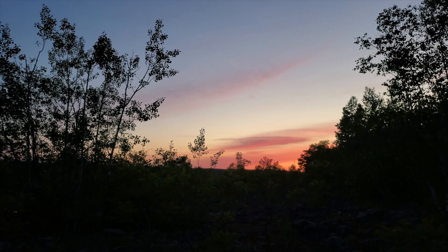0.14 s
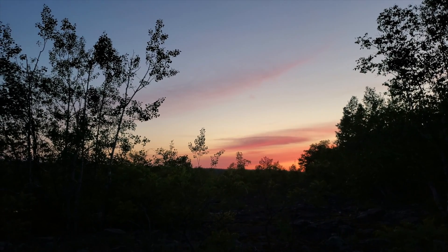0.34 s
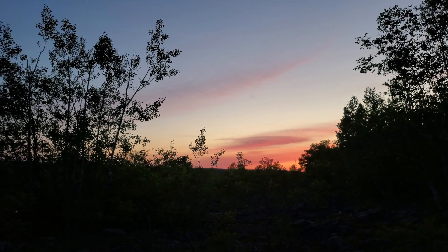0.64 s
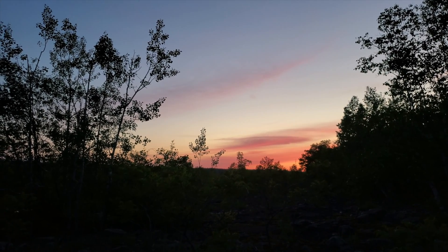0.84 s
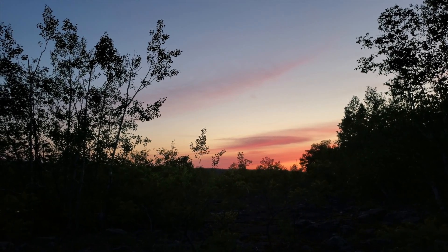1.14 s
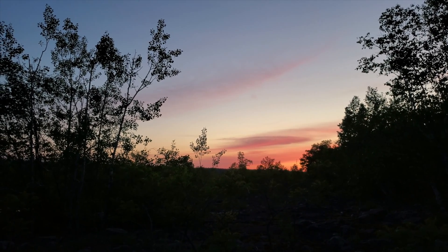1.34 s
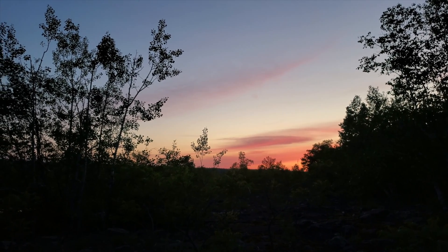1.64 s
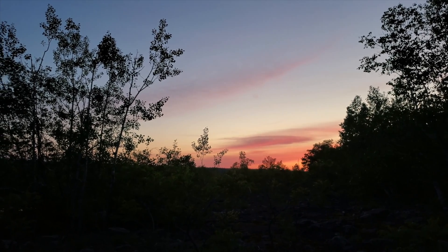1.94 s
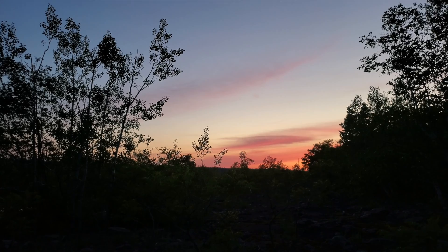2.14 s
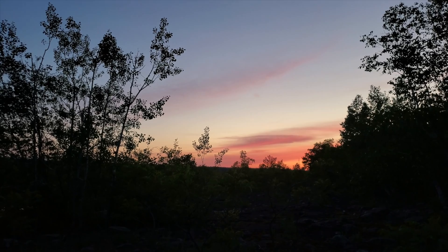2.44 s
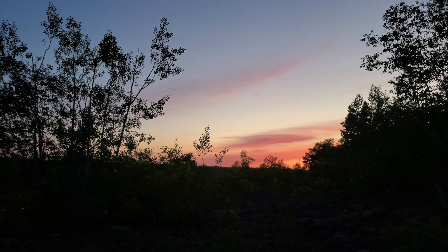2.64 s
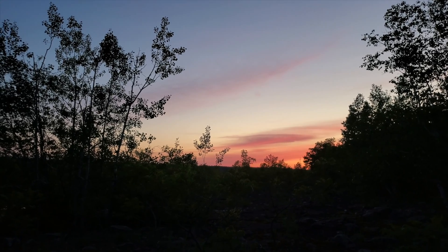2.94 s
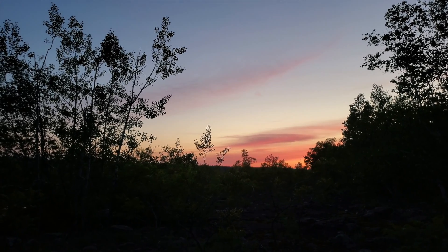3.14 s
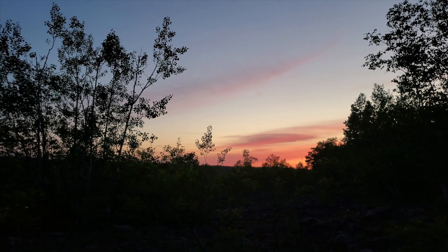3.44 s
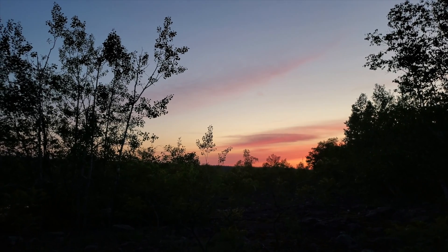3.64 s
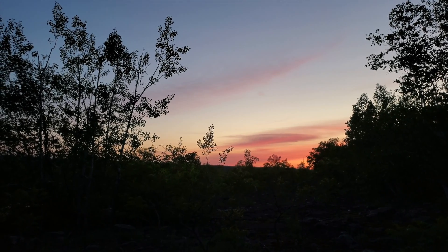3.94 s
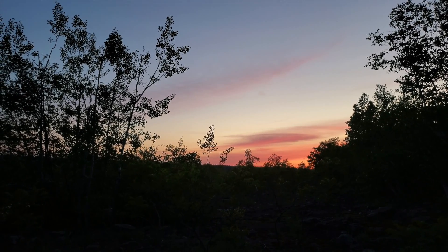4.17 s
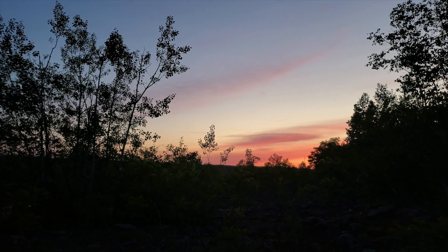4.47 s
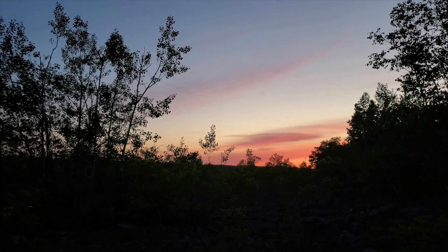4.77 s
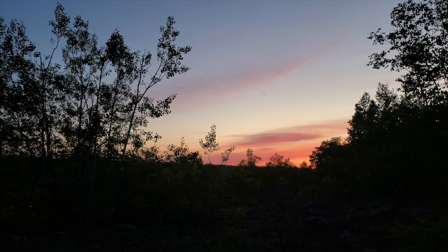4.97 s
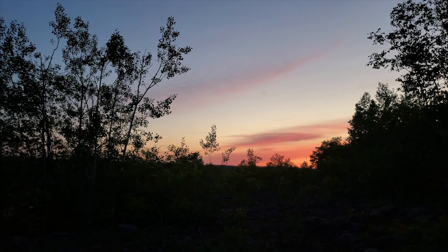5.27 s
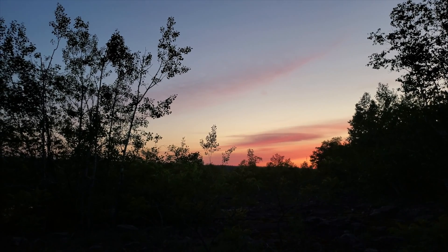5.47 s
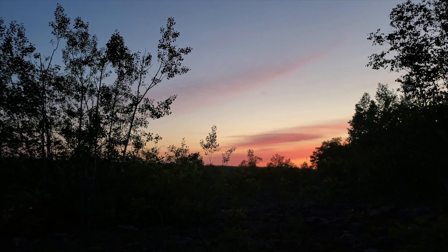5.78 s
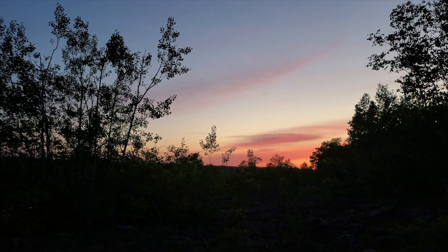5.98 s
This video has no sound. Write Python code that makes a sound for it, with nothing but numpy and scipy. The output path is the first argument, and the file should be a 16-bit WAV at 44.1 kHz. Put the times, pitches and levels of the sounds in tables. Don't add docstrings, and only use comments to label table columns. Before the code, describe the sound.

Dusk in a forest clearing, picked up in stereo. A nightjar dominates with pure whistled three-note songs, peaking near 1.0, 1.9, 2.9, 3.8, 4.8 and 5.7 s; another song begins as the stretch ends. Each has a brisk first note around 1.6 kHz, a lower stepped second, then a leap to 2.7 kHz falling back; from the second song a soft low cluck leads it. Trees return a diffuse echo lasting under a second. Nighthawks rasp for a quarter second on the left: near at 1.9, 3.3 and 5.1 s, fainter at 0.4, 0.9, 2.7, 3.9, 4.5 and 5.7. Thin bird whistles appear at the start, 1.8, around 4.1-4.5 and 5.8 s. Faint frogs trill in bouts over a distant blurred chorus. Underneath: low rumble, wavering 95 Hz hum, weak leaf rustle, hiss swelling with calls, and soft bumps near 0.6, 1.6, 1.9, 3.9 (very faint), 5.6 and 5.8 s.

```python
import sys
import numpy as np
from scipy import signal
from scipy.fft import rfft, irfft, next_fast_len
from scipy.io import wavfile
from scipy.ndimage import uniform_filter1d

SR = 44100
rng = np.random.default_rng(int(sys.argv[2]) if len(sys.argv) > 2 else 0)


def generate_wav(signal):
    frames = np.transpose(np.atleast_2d(signal))
    scaled = np.clip(frames, -1, 1) * 32767
    pcm = np.round(scaled).astype(np.int16)
    wavfile.write(sys.argv[1], SR, pcm)


def boost(x):
    u = np.asarray(x, float) / 20
    return 10 ** u


N = 269451

# frequency in Hz, density in dB per Hz.
RUMBLE_SPECTRUM = [(20, -29), (39, -9), (59, 3), (113, -3), (136, -10.5), (151, -20.5), (200, -33),
                   (440, -120)]
# centre in seconds, level in dB.
GUSTS = [(0.02, -75), (1.99, -58), (3.899, -65), (4.47, -74), (4.78, -55.5), (5.23, -60.5), (5.62, -64.5),
         (5.82, -53.5)]
# frequency in Hz, density in dB per Hz.
RUSTLE_SPECTRUM = [(120, 3.5), (200, 1.5), (400, -0.5), (700, -6), (1100, -44.5)]
# start in seconds, length in seconds, level in dB.
BREEZES = [
    (.3, 0.89, -79.5),
    (1.55, 0.71, -76.5),
    (2.55, 0.69, -72.5),
    (3.6, 0.59, -69.5),
    (4.65, .85, -74.5),
    (5.8, .6, -74.5),
]
# time in seconds, peak in dB, left minus right in dB.
BUMPS = [
    (0.579, -55, 7),
    (1.562, -41, -17.5),
    (1.946, -38.5, -15),
    (3.857, -64, 55),
    (5.636, -40.5, -22),
    (5.82, -39.5, -11),
]
# frequency in Hz, density in dB.
HISS_SPECTRUM = [(1500, -29), (2800, -12), (3400, -6.5), (4200, -18), (5500, -18), (8000, -23.5),
                 (13000, -14.5), (16000, -17)]
# chirps per second, first chirp in seconds, lowest pitch in Hz, highest pitch in Hz,
# half-pitch level in dB, left minus right in dB.
FROGS = [
    (16.93, 0.041, 1720, 2200, -11, 11.5),
    (25.42, 0.019, 1900, 2400, -6, 3.5),
    (37.35, 0.015, 1100, 2250, -20, -1),
]
# start in seconds, length in seconds, level in dB.
FROG_BOUTS = [
    [(.15, 1.07, -60), (1.3, 0.79, -63), (2.25, 1, -63), (3.85, 1.42, -61), (5.7, 1.1, -65)],
    [(-.4, .7, -69), (.5, 1.6, -72.5), (2.3, 1.1, -73), (3.5, 2, -69), (5.6, 1.1, -72.5)],
    [(.15, 1.95, -77), (2.15, 1.25, -66.5), (3.6, 1.9, -69.5), (5.6, 1.1, -70.5)],
]
# frequency in Hz, width in Hz, level in dB, left minus right in dB.
CHORUS_THROATS = [(1112, 990, -14, 41), (1230, 100, -9.5, 24), (1977, 250, -0.5, 2.7)]
# frequency in Hz, time to fall by 60 dB in seconds.
TREES_T60 = [(800, 1), (1200, 0.97), (1700, 0.64), (2400, 0.66), (3400, 0.77), (5000, 0.8), (7500, 0.42)]
# start in seconds, length in seconds, first pitch in Hz, last pitch in Hz.
WHISTLES = [
    (-.12, .3, 3500, 3380),
    (.17, .19, 2680, 2880),
    (.37, .16, 2700, 2850),
    (1.76, .12, 4130, 3880),
    (4.11, .09, 3150, 3080),
    (4.09, .2, 3600, 3750),
    (4.19, .38, 3670, 4290),
    (4.11, .15, 4200, 4150),
    (5.79, .1, 3800, 3700),
]
WHISTLE_PEAKS_DB = [-76.5, -77.5, -68.5, -62, -58.5, -54.5, -54, -66.5, -74]
# time of the highest pitch in seconds, level in dB, cluck in dB, first note in dB.
SONGS = [
    (.972, -14.5, -39, -4.5),
    (1.9489, -12.5, 8, -3.5),
    (2.8728, -12.5, 6.5, -1),
    (3.814, -12, 8.5, 0),
    (4.7742, -12.5, 8, -0.5),
    (5.715, -12, 9, 0),
    (6.66, -7.5, 5, 8),
]
SONG_LENGTHS = [1.03, 1.02, .99, 1.0, 1.006, .998, 1.0]
# seconds from its highest pitch, pitch in Hz, level in dB.
CLUCK = [(-.588, 1024, -61.5), (-.583, 983, -34), (-.577, 830, -52), (-.557, 666, -57.5)]
WHIP = [(-.514, 1317, -51), (-.506, 1347, -26), (-.492, 1383, -9), (-.482, 1577, -10), (-.464, 1693, -13),
        (-.445, 1702, -7.5), (-.428, 1625, -11), (-.405, 1606, -16.5), (-.36, 1615, -43.5)]
POOR = [(-.265, 1243, -41.5), (-.22, 1270, -20.5), (-.195, 1258, -26), (-.184, 1372, -10.5),
        (-.174, 1517, -13), (-.136, 1575, -8), (-.121, 1371, -10), (-.088, 1570, -12), (-.066, 1624, -8.5)]
WILL = [(-.054, 1414, -8), (-.036, 1759, -10), (-.031, 1831, -3.5), (-.002, 2718, 1), (.006, 2616, 2),
        (.024, 1996, 2), (.04, 1886, 1), (.064, 1758, -6.5), (0.073, 1697, -49.5)]
# pitch in Hz, left minus right in dB.
SONG_SIDE = [(1000, 9), (1390, 14), (1570, 13), (1650, -2.5), (1850, 11), (2000, 10), (2330, -9),
             (2700, 10)]
# frequency in Hz, level in dB.
OVERTONES = [(2400, -55.5), (3300, -29), (4900, -43), (5900, -53), (6650, -36), (8000, -37), (8600, -48.5),
             (11000, -55)]
# start in seconds, level in dB, left minus right in dB, length factor,
# pitch factor.
BUZZES = [
    (0.444, -35.5, 40, 0.92, 0.95),
    (0.868, -47.5, 14, 0.97, 0.92),
    (1.853, -23.5, 10.5, 0.87, 0.9),
    (2.685, -59.5, 13.5, 1.28, 0.82),
    (3.302, -22.5, 14.5, 0.95, 0.91),
    (3.936, -45.5, 25, 1.02, 0.96),
    (4.519, -53.5, 14.5, 1.1, .88),
    (5.082, -22, 20, 0.91, 0.91),
    (5.654, -39, 37.5, 0.97, 0.87),
]


def rms_one(x):
    return x / np.sqrt(np.mean(x ** 2) + 1e-20)


def at_hz(points, hz):
    points = np.array(points)
    return np.interp(np.log(hz), np.log(points[:, 0]), points[:, 1])


def sides(pan_db):
    left = boost(pan_db)
    return np.array([2 * left / (1 + left), 2 / (1 + left)]).reshape(2, -1)


def drift(rate):
    r = np.exp(-2 * np.pi * rate / SR)
    noise = rng.standard_normal(N + SR)
    return rms_one(signal.lfilter([1], [1, -2 * r, r * r], noise)[SR:])


def coloured(spectrum, alike):
    mid, side = rng.standard_normal((2, N))
    pair = np.sqrt(1 + alike) * mid + np.sqrt(1 - alike) * side * [[1], [-1]]
    size = next_fast_len(N)
    hz = np.maximum(np.arange(size // 2 + 1) * SR / size, 1)
    return rms_one(irfft(rfft(pair, size) * boost(at_hz(spectrum, hz)), size)[:, :N])


def bout_gain(bouts):
    t = np.arange(N) / SR
    swell_s, fade_s = 0.15, 0.18
    gain = 0
    for s, length, level_db in bouts:
        ramp = np.minimum((t - s) / swell_s, (s + length - t) / fade_s)
        gain = gain + boost(level_db) * np.clip(ramp, 0, 1) ** 2
    return gain


def trees(x, first_s, early_db, early_t60):
    t, tail = np.arange(SR) / SR, 0
    edges = 600 * 2 ** np.arange(0, 4.6, .5)
    for low, high in zip(edges, edges[1:]):
        half_octave = signal.butter(2, [low, high], "band", fs=SR, output="sos")
        band = signal.sosfilt(half_octave, rng.standard_normal((2, SR)))
        late_decay = boost(-60 * t / at_hz(TREES_T60, low))
        early_decay = boost(early_db - 60 * t / early_t60)
        tail = tail + band * (late_decay + early_decay)
    tail *= np.clip(t / first_s, 0, 1) ** 2
    tail /= np.sqrt(np.sum(tail ** 2) / 2)
    return signal.fftconvolve(x[None], tail, axes=1)[:, :N]


def in_time(rows, start, stretch):
    s, *columns = np.transpose(rows)
    ends = np.round((start + stretch * s[[0, -1]]) * SR).astype(int)
    span = np.arange(*np.clip(ends, 0, N))
    age = span / SR - start
    return [span, age] + [np.interp(age, stretch * s, c) for c in columns]


def rumble(open_db):
    t = np.arange(N) / SR
    gust_s = .07
    gusts = sum(boost(gust_db) * np.exp(-((t - s) / gust_s) ** 2) for s, gust_db in GUSTS)
    gain = boost(-66.5 + 0.18 * open_db) + gusts
    lumps = boost(5.5 + 2.0 * drift(20.0))
    return gain * lumps * coloured(RUMBLE_SPECTRUM, alike=0.27) * sides(2.7)


def rustle(open_db):
    spectrum = [(60, -51.5)] + RUSTLE_SPECTRUM + [(2500, -48)]
    gain = boost(-74 + .15 * open_db) + bout_gain(BREEZES)
    return gain * boost(3.0 + 1.0 * drift(4.7)) * coloured(spectrum, alike=0.31) * sides(3.0)


def hum():
    hz = 94.5 + 2.6 * drift(1)
    return boost(-66 + 1.9 * drift(1.2)) * np.sin(2 * np.pi * np.cumsum(hz) / SR) * sides(3.4)


def bumps():
    out = np.zeros((2, N))
    t = np.arange(-400, 400) / SR
    pulse = np.cos(2 * np.pi * 190 * t) * np.exp(-(t / 0.0033) ** 2)
    for s, peak_db, pan_db in BUMPS:
        at = round((s + 0.0064) * SR)
        out[:, at - 400:at + 400] += boost(peak_db - 5.5) * sides(pan_db) * pulse
    return out


def hiss(loudness):
    gate = 1 + 7 * loudness
    return boost(-75.5 + 5.5) * gate * coloured(HISS_SPECTRUM, alike=.02) * sides(4.3)


def frogs(open_db):
    out, t = np.zeros((3, N)), np.arange(N) / SR
    for (rate, first, low_hz, high_hz, half_db, pan_db), bouts in zip(FROGS, FROG_BOUTS):
        cycle = ((t - first) * rate + .2 * drift(2.8)) % 1 / .6
        hz = (low_hz + (high_hz - low_hz) * cycle) * (1 + .035 * drift(6))
        half_phase = np.pi * np.cumsum(hz) / SR
        pulse = np.sin(np.pi * np.minimum(cycle, 1)) ** 2.2
        chirp = pulse * (np.sin(2 * half_phase) + boost(half_db) * np.sin(half_phase))
        waver = boost(0.25 * open_db + 17.0 + 2 * drift(9))
        out += chirp * bout_gain(bouts) * waver * np.vstack([sides(pan_db), [1]])
    echo = trees(out[2], first_s=.015, early_db=2, early_t60=.2)
    return boost(-2) * out[:2] + boost(-1) * sides(5) * echo


def frog_chorus():
    out = np.zeros((2, N))
    for hz, width, throat_db, pan_db in CHORUS_THROATS:
        r = np.exp(-np.pi * 1.55 * width / SR)
        poles = [1, -2 * r * np.cos(2 * np.pi * hz / SR), r * r]
        band = signal.lfilter([1, 0, -1], poles, rng.standard_normal((2, N)))
        band = signal.lfilter([1, 0, -1], poles, band)
        out += rms_one(band) * boost(-58 + throat_db + 2.0 * drift(19)) * sides(pan_db)
    return out


def whistle(rows, start, level_db, stretch, overtones=False):
    span, age, hz, tone_db, pan_db, depth = in_time(rows, start, stretch)
    warble = np.cos(2 * np.pi * 87 * (age / stretch + 0.02906))
    gain = np.sqrt(2) * boost(tone_db + level_db + 2 * depth / 100 * warble)
    phase = 2 * np.pi * (np.cumsum(hz + depth * warble) / SR + rng.random())
    upper = sum(boost(at_hz(OVERTONES, k * hz)) * np.sin(k * phase) for k in range(2, 5)) * overtones
    out = np.zeros((3, N))
    out[:2, span] = gain * (np.sin(phase) + boost(-13.5) * upper) * sides(pan_db)
    out[2, span] = gain * (np.sin(phase) + upper)
    return out


def small_birds():
    out, u = 0, np.linspace(0, 1, num=15)
    for (s, length, first_hz, last_hz), peak_db in zip(WHISTLES, WHISTLE_PEAKS_DB):
        hz = first_hz + (last_hz - first_hz) * u
        level_db = peak_db - 28 * (2 * u - 1) ** 2
        pan_db, warble_hz = 7 + 0 * u, 75 + 0 * u
        rows = np.transpose([length * u, hz, level_db, pan_db, warble_hz])
        out = out + whistle(rows, s, -6.0, 0.93)
    echo = trees(out[2], first_s=0.0056, early_db=20.0, early_t60=0.047)
    return out[:2] + boost(11.0) * sides(4.9) * echo


def note(curve):
    s, hz, level_db = np.transpose(curve)
    t = np.arange(s[0], s[-1], .002)
    hz, level_db = np.interp(t, s, hz), np.interp(t, s, level_db)
    depth = 157 * np.exp(-((t + 0.032) / 0.026) ** 2)
    return np.transpose([t, hz, level_db, at_hz(SONG_SIDE, hz), depth])


def nightjar():
    out = 0
    for (s, level_db, cluck_db, whip_db), stretch in zip(SONGS, SONG_LENGTHS):
        for curve, note_db in ((CLUCK, cluck_db), (WHIP, whip_db), (POOR + WILL, 0)):
            out = out + whistle(note(curve), s, level_db + note_db - 8.5, stretch, overtones=True)
    echo = trees(out[2], first_s=0.0072, early_db=2.0, early_t60=0.16)
    return out[:2] + boost(-5.5) * sides(5.8) * echo


def buzz(far_db):
    length_s, sinks_s, stop_s = .236, .11, .008
    t = np.linspace(0, length_s, num=60)
    late = np.clip((t - sinks_s) / (length_s - sinks_s), 0, 1)
    high_hz = 5323 - 1502 * np.exp(-t / .014) - 1347.6 * late ** 1.4
    level_db = -42 * np.exp(-t / .013) - 1.83 * late ** 0.6
    level_db -= 25 * np.clip(1 - (length_s - t) / stop_s, 0, 1)
    swings_per_s = 235 + 15 * (t / .13 - 1) ** 2
    top_swell_db = 16 - 8 * late
    uneven = .011 + .0012 * far_db + .09 * late ** 1.6
    return np.transpose([t, high_hz, level_db, swings_per_s, top_swell_db, uneven])


def nighthawks():
    low_hz, near_db = 3073, -19.5
    straight = .9
    out, wobble, shake = np.zeros((3, N)), drift(150), drift(130)
    for s, level_db, pan_db, stretch, pitch in BUZZES:
        far_db = max(near_db - level_db, 0)
        overtone_db = -10.5 - 1.2 * far_db
        echo_db = -4.5 + 0.2 * far_db
        span, age, high_hz, tone_db, rate, swell_db, uneven = in_time(buzz(far_db), s, stretch)
        turn = 2 * np.pi * (np.cumsum(rate) / SR + uneven * wobble[span])
        skewed = np.cos(turn + 0.35 * np.sin(turn))
        swing = .5 - .5 * np.arcsin(straight * skewed) / np.arcsin(straight)
        hz = pitch * (low_hz + (high_hz - low_hz) * swing)
        phase = 2 * np.pi * np.cumsum(hz) / SR
        tone = boost(swell_db * (swing ** 2 - 1) * .75 + 40 * uneven * shake[span]) * np.sin(phase)
        upper = np.sin(2 * phase + 5.0 * shake[span]) * boost(-5 * swing)
        third = np.sin(3 * phase + 3.5 * shake[span])
        upper += boost(-9.5) * third * np.clip((4900 - high_hz) / 600, 0, 1)
        upper *= boost(overtone_db - 8.0) * np.minimum(age / .035, 1)
        call = (tone + upper) * boost(tone_db + level_db - 3.0)
        out[:, span] += call * np.vstack([sides(pan_db), [boost(echo_db)]])
    throat = signal.butter(3, 3300, "high", fs=SR, output="sos")
    out = signal.sosfilt(throat, out + 1e-18)
    out[1] = np.roll(out[1], 5)
    echo = trees(out[2], first_s=0.0093, early_db=10.5, early_t60=0.24)
    return out[:2] + sides(10.7) * echo


def scene():
    birds = nightjar() + nighthawks() + small_birds()
    loudness = np.sqrt(np.abs(uniform_filter1d(birds[0] ** 2, size=3000)))
    slow = uniform_filter1d(loudness, size=int(0.079 * SR))
    open_db = 20 * np.log10(slow + boost(-53)) + 34.5
    ground = rumble(open_db) + rustle(open_db) + hum() + bumps()
    return birds + frogs(open_db) + frog_chorus() + ground + hiss(loudness)


def low_pass(x):
    return signal.sosfilt(signal.butter(12, 15890, fs=SR, output="sos"), x)


def record(dry):
    return low_pass(dry)


dry = scene()
out = record(dry)
generate_wav(out)
```